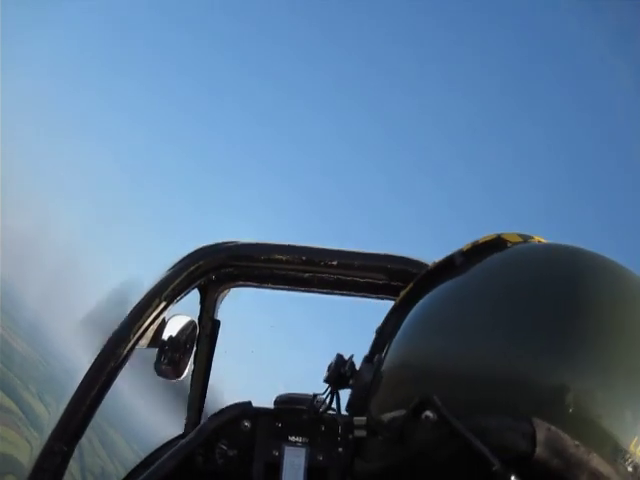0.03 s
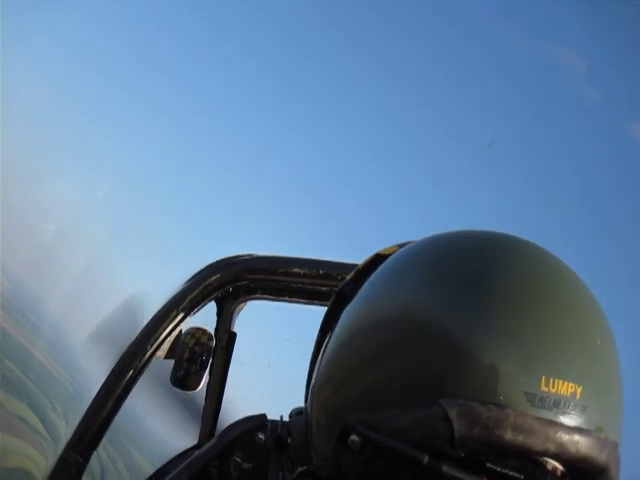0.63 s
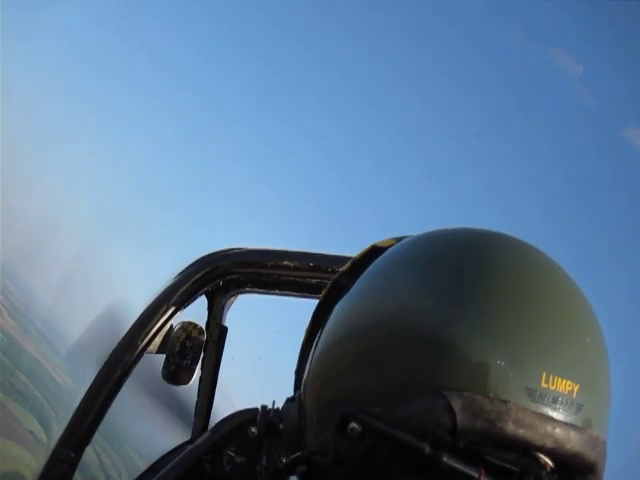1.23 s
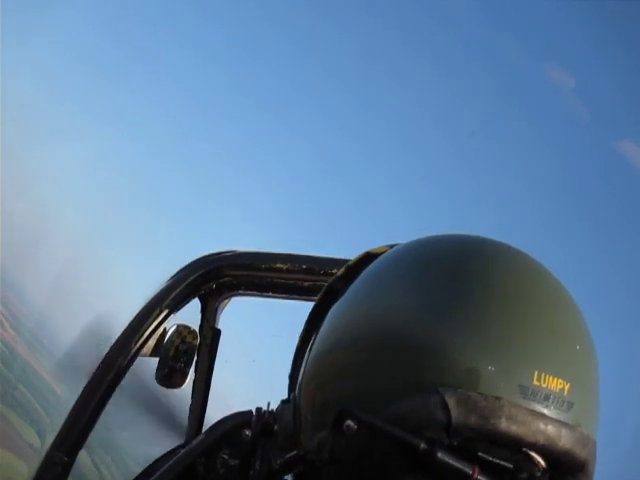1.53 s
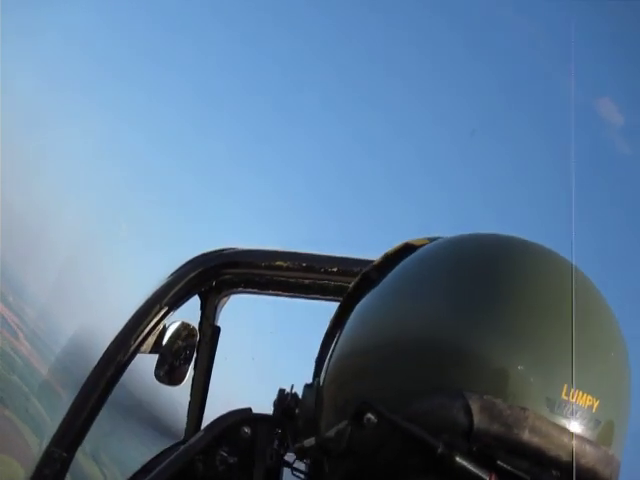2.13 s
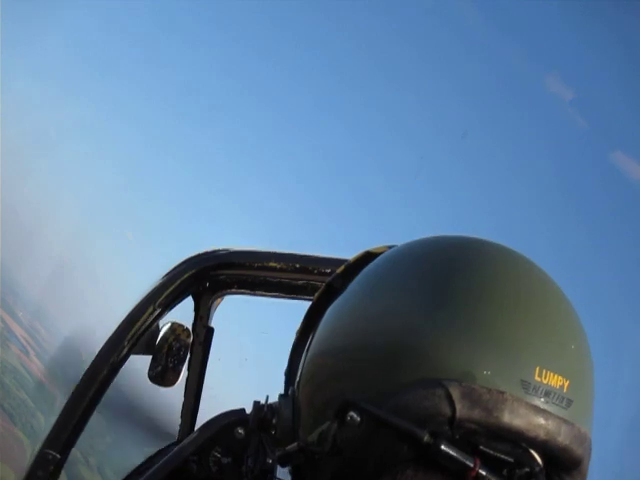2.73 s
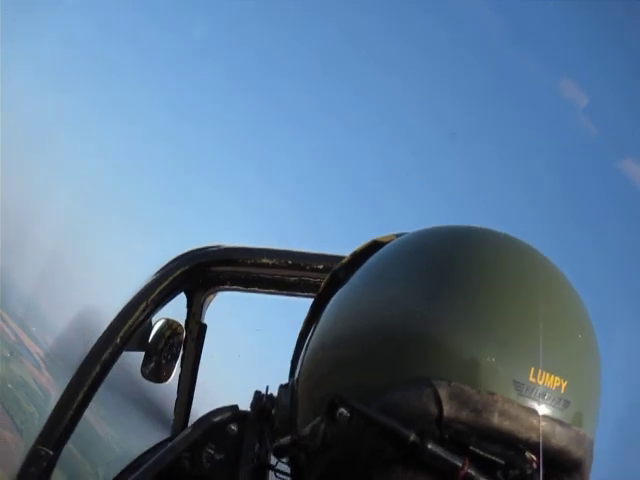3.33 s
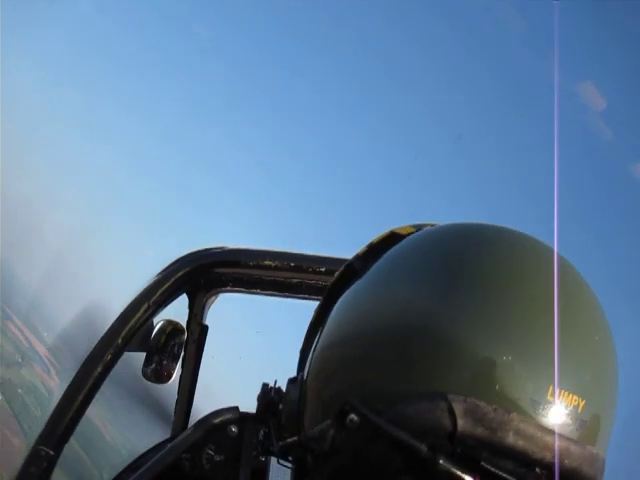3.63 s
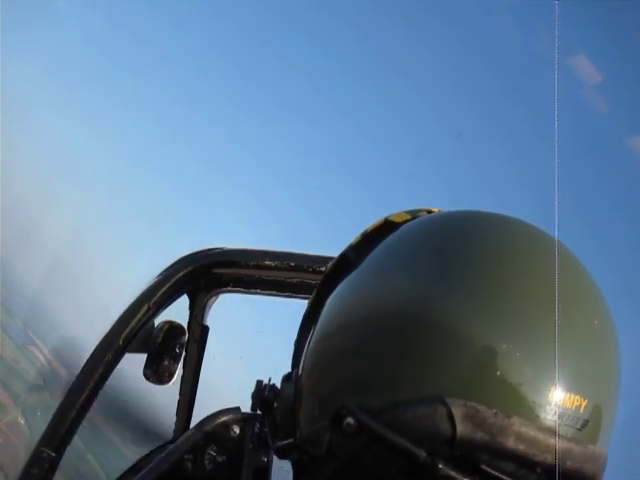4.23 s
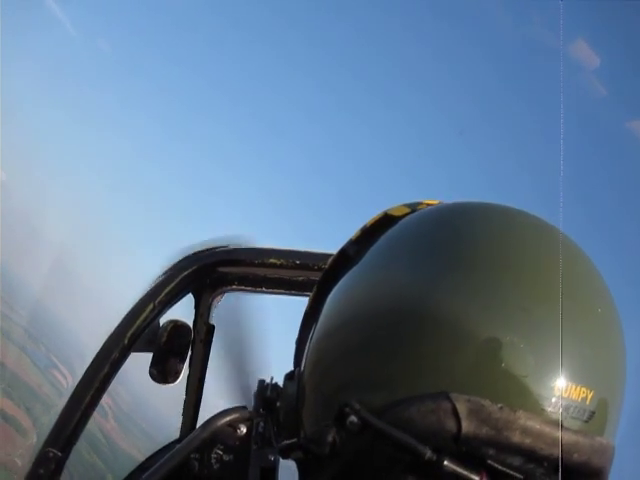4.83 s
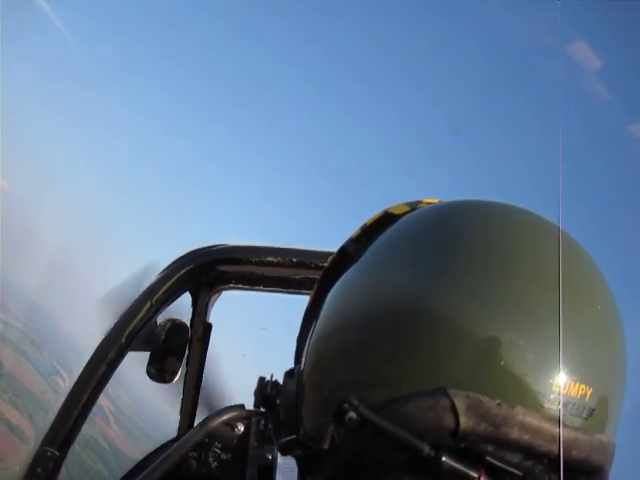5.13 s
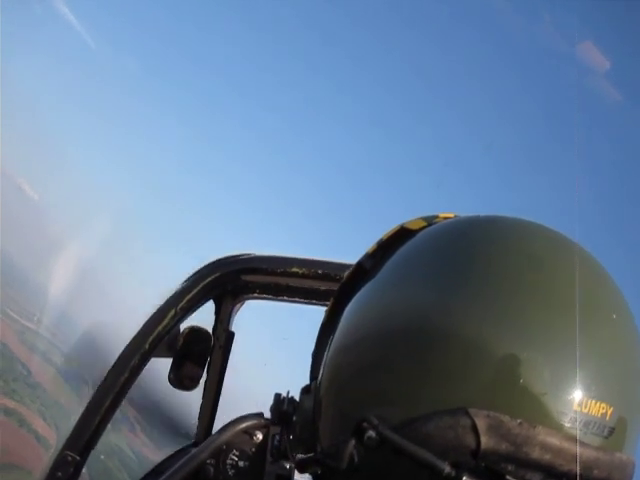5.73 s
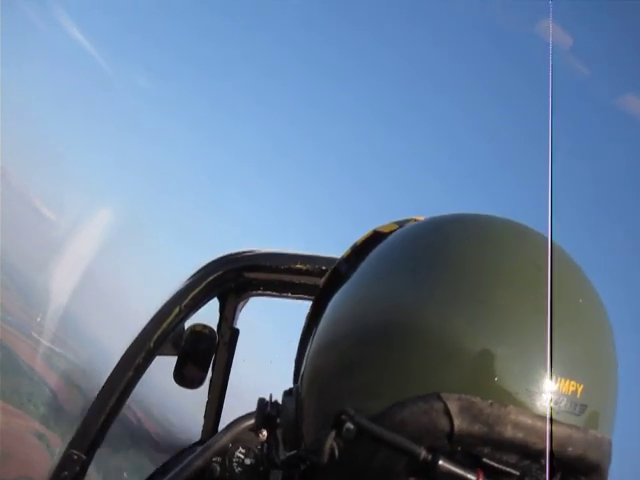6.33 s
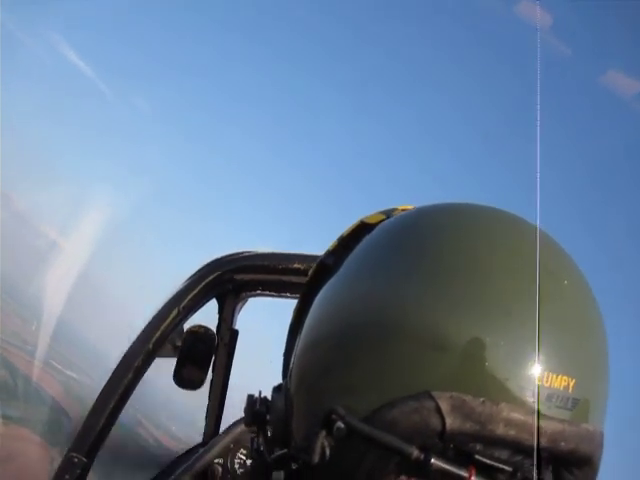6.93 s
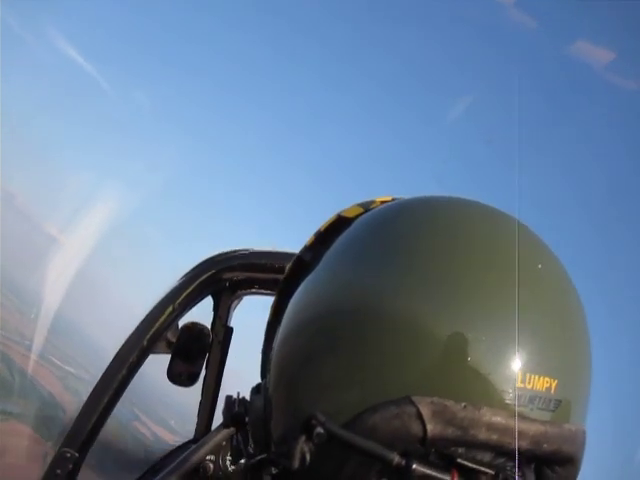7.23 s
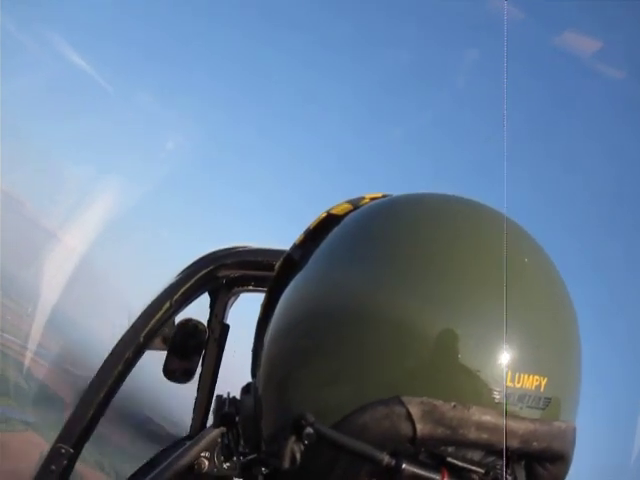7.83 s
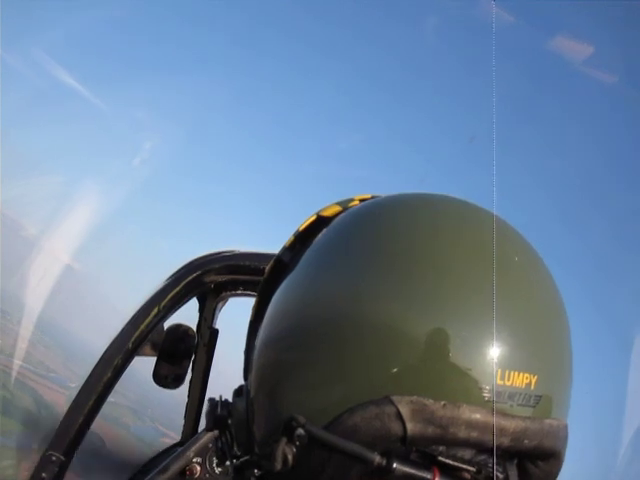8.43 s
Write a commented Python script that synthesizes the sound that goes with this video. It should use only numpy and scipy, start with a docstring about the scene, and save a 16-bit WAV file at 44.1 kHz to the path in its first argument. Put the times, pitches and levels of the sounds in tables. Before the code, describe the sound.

A piston aircraft engine roars steadily in flight, heard from inside the closed cockpit. The exhaust has a fast, rasping crackle, with propeller drone, a hollow howl and rushing air underneath. A few dull thumps from the overloaded microphone come mostly in the first second. About halfway through the roar softens a little, and near the end the engine slows slightly.

```python
"""The steady roar of a twelve-cylinder piston aircraft at cruise, heard inside the closed cockpit.
Exhaust puffs ring the canopy and panels; one cylinder cracks sharply every cycle over a fainter clatter.
Beneath are the airframe's drone, a four-blade propeller, a hollow howl and rushing air.
The recorder overloads in a few dull thumps. The roar softens near 4 s; the engine slows a little at the end.
"""
import sys
import numpy as np
from scipy import signal
from scipy.fft import rfft, irfft
from scipy.io import wavfile
from scipy.ndimage import uniform_filter1d, minimum_filter1d, map_coordinates

SR = 44100
rng = np.random.default_rng(int(sys.argv[2]) if len(sys.argv) > 2 else 0)


def generate_wav(signal):
    """Clip the signal to [-1, 1] and save it as 16-bit WAV at the path in sys.argv[1]."""
    frames = np.transpose(np.atleast_2d(signal))
    scaled = np.clip(frames, -1, 1) * 32767
    pcm = np.round(scaled).astype(np.int16)
    wavfile.write(sys.argv[1], SR, pcm)


N = 373968
TIME = np.arange(N) / SR

# Engine speed. Each row: time in seconds, four-stroke cycles per second.
CYCLE_RATE = [(0.0, 20.85), (1.0, 20.855), (2.0, 20.839), (3.0, 20.9), (3.5, 20.904), (4.0, 20.833),
              (4.5, 20.615), (5.0, 20.686), (5.5, 20.763), (6.0, 20.818), (6.5, 20.827), (7.0, 20.877),
              (7.25, 20.796), (7.5, 20.596), (8.0, 20.065), (8.48, 19.775)]
# Exhaust roar strength. Each row: time in seconds, level in dB.
ROAR_LEVEL = [(0, -12), (.25, -13.5), (.5, -12.5), (1.2, -13), (2.2, -13.5), (3.7, -13), (4.15, -15.5),
              (5.2, -16), (6, -17), (7.5, -17), (8.48, -17)]
# The twelve firings. Each row: place in the cycle from 0 to 1, relative level in dB.
FIRINGS = [(.01, -4), (.09, 0), (.175, -3), (.27, -4.5), (.385, -1), (.48, -2.5), (.55, -4), (.605, -3.5),
           (.742, 1.5), (.825, 1), (.88, -2.5), (.94, -1.5)]
# Canopy and panel resonances. Each row: centre in Hz, width in Hz, lift in dB.
PANEL_MODES = [(1196, 60, 2), (1297, 67, 5.5), (1470, 130, 4.5), (1720, 120, 7), (1868, 160, 3.5),
               (2097, 167, 8.5), (2306, 99, 8.5), (2510, 35, 9), (2660, 177, 6.5), (2862, 190, 8),
               (3047, 50, 10.5), (3300, 410, 5.5), (3505, 164, 7), (3757, 65, 8), (4080, 71, 7.5),
               (4530, 260, 7), (4950, 100, 7), (5460, 110, 6), (6120, 66, 4.5), (7170, 760, 3),
               (7300, 670, -2)]
# Resonances struck by crack and clatter. Each row: centre in Hz, width in Hz, relative level in dB.
CRACK_MODES = [(2966, 340, -7.5), (3580, 570, -9), (4460, 370, -9), (6820, 1040, -9)]


def amp(db):
    """Decibels to gain."""
    return 10 ** (np.asarray(db) / 20)


def unit(x):
    """Scale to unit rms."""
    return x / np.sqrt(np.mean(x ** 2) + 1e-20)


def curve(rows):
    """Join (seconds, value) rows by straight lines."""
    return np.interp(TIME, *np.transpose(rows))


def drift(rate_hz, size=2048):
    """Slow random wander of unit rms."""
    hz = np.fft.rfftfreq(size, TIME[-1] / size)
    wander = unit(irfft(rfft(rng.standard_normal(size)) * np.exp(-(hz / rate_hz) ** 2), size))
    return np.interp(TIME, np.linspace(0, TIME[-1], size), wander)


def colour(x, spectrum, resonances=(), size=8192):
    """Minimum-phase filter of unit power gain: a broad spectrum lifted by ringing resonances."""
    hz = np.fft.rfftfreq(size, 1 / SR)
    knot_hz, knot_db = np.transpose(spectrum)
    db = np.interp(np.log(hz + 1), np.log(knot_hz + 1), knot_db)
    for centre_hz, width_hz, lift_db in resonances:
        db = db + lift_db / (1 + (2 * (hz - centre_hz) / width_hz) ** 2)
    log_gain = np.log(amp(np.r_[db, db[-2:0:-1]]))
    response = np.exp(np.conj(signal.hilbert(log_gain)))
    taps = np.fft.ifft(response).real[:size // 2]
    return signal.oaconvolve(x, taps / np.linalg.norm(taps))[:N]


def resonate(x, hz, width_hz):
    """Resonance following the curve hz; a double pole gives steep flanks."""
    carrier = np.exp(2j * np.pi * np.cumsum(hz) / SR)
    pole = np.exp(-np.pi * width_hz / SR)
    return (carrier * signal.lfilter([(1 - pole) ** 2], [1, -2 * pole, pole * pole], x / carrier)).real


def puff(age_cycles, rise_cycles, sharpness):
    """Gas flow after an exhaust valve opens: rises to one, then dies away."""
    u = np.maximum(age_cycles, 0) / rise_cycles
    return (u * np.exp(1 - u)) ** sharpness


def exhaust(cycles, repeat_share=0.13, floor_db=-3.5, scatter_db=3.0, surge_db=0.48, size=2048):
    """Twelve puffs a cycle ring the panels; part of the flow repeats each cycle, the rest is turbulence."""
    flow_power = amp(floor_db) ** 2
    for place, db in FIRINGS:
        cycle, age = np.divmod(cycles - place + 1, 1)
        force = amp(db + scatter_db * rng.standard_normal(size))  # no two burns alike
        flow = force[cycle.astype(int)] * puff(age, rise_cycles=.024, sharpness=.8)
        flow_power = flow_power + flow ** 2
    pattern = rng.standard_normal(size)
    repeating = unit(map_coordinates(pattern, [cycles % 1 * size], order=3, mode="grid-wrap"))
    gas = np.sqrt(repeat_share) * repeating + np.sqrt(1 - repeat_share) * rng.standard_normal(N)
    # Roar spectrum. Each row: frequency in Hz, relative density in dB.
    spectrum = [(350, -12.5), (480, -21.5), (600, -9), (720, -10.5), (780, -4), (1020, -11.5), (1080, -7.5),
                (1400, -13), (1500, -5.5), (3300, -11), (5500, -8), (7500, -7), (10800, -12.5),
                (17000, -31.5)]
    roar = unit(colour(np.sqrt(flow_power) * gas, spectrum, PANEL_MODES))
    return amp(curve(ROAR_LEVEL) + surge_db * drift(25)) * roar


def crack_force(cycles, load_db, full_db=-5, shortfall_db=2.0, size=256):
    """Force follows the load; burns fall short at random, and a few set ones hit hard."""
    # Hard burns. Each row: time in seconds, level in dB relative to full force.
    hard_burns = [(.93, 4), (.978, 4), (3.853, -2), (4.771, 1.5), (6.072, -1), (7.32, 1.5), (7.611, 0.5)]
    burn_db = -shortfall_db * rng.gamma(2, .5, size)
    for time_s, db in hard_burns:
        burn_db[int(np.interp(time_s, TIME, cycles))] = db
    return amp(full_db + load_db + burn_db[cycles.astype(int)])


def crack(cycles, load_db, place=.39, hiss_db=-4, scatter_db=3.0, detune=0.049, size=256):
    """One cylinder blows down with a bright crack once a cycle, ringing at slightly new pitches."""
    # Blowdown hiss spectrum. Each row: frequency in Hz, relative density in dB.
    spectrum = [(300, -13), (600, -26), (1500, -2.5), (2200, -5), (2800, -3.5), (4400, -0.5), (5100, -0.5),
                (6700, 5.5), (8000, 6.5), (9000, -6), (10000, 6.5), (11000, -11.5), (17000, -19)]
    cycle = cycles.astype(int)
    burst = puff(cycles % 1 - place, rise_cycles=.026, sharpness=1.15) * crack_force(cycles, load_db)
    burst_rms = np.sqrt(np.mean(burst ** 2))
    sound = amp(hiss_db) * colour(burst * rng.standard_normal(N), spectrum, PANEL_MODES)
    for hz, width_hz, db in CRACK_MODES:
        force, shift = rng.standard_normal((size, 2))[cycle].T
        drive = burst * amp(scatter_db * force) * rng.standard_normal(N)
        ring = resonate(drive, hz * (1 + detune * shift), width_hz)
        sound = sound + unit(ring) * burst_rms * amp(db)
    return sound


def clatter(cycles, load_db, gain_db=-21, follow=1.25, scatter_db=6.0, detune=0.093, width_ratio=0.63):
    """Every firing strikes the crack's resonances faintly, each with its own force and pitch."""
    firing, fraction = np.divmod(len(FIRINGS) * cycles, 1)
    burst = puff(fraction / len(FIRINGS), rise_cycles=.02, sharpness=1.15)
    sound = 0
    for hz, width_hz, db in CRACK_MODES:
        force, shift = np.clip(rng.standard_normal((4096, 2)), -2, 2)[firing.astype(int)].T
        drive = burst * amp(scatter_db * force) * rng.standard_normal(N)
        ring = resonate(drive, hz * (1 + detune * shift), width_ratio * width_hz)
        sound = sound + amp(db) * unit(ring)
    return sound * amp(gain_db + follow * load_db)


def canopy(x, echo_db=-16, decay_s=0.011, above_hz=5000, size=600):
    """The hard canopy throws treble back within milliseconds, rippling the spectrum."""
    taps = rng.standard_normal(size) * np.exp(-np.arange(size) / SR / decay_s)
    treble = signal.sosfilt(signal.butter(2, above_hz, "highpass", fs=SR, output="sos"), x)
    return x + amp(echo_db) * signal.oaconvolve(treble, taps / np.linalg.norm(taps))[:N]


def drone(cycles, load_db, follow=0.38, waver_db=1.73, waver_hz=2.5, slip_rad=0.01, slip_hz=8):
    """The airframe carries the engine orders; uneven burns blur the higher ones more."""
    # Engine tones. Each row: multiple of the cycle rate, level in dB at mean load.
    orders = [(2, -58), (3, -38.5), (4, -43.5), (5, -43.5), (6, -36.5), (7, -42), (9, -45.5), (10, -48.5),
              (11, -45), (12, -43), (14, -46), (15, -42), (17, -45), (21, -51), (22, -49), (28, -48),
              (30, -50.5), (32, -46.5), (36, -51), (37, -44), (38, -38), (39, -41.5), (41, -34.5),
              (43, -46), (44, -39), (47, -37.5), (49, -38.5), (50, -42), (58, -41.5), (59, -42),
              (73, -39.5), (82, -41), (85, -40), (91, -39.5), (100, -43), (145, -44)]
    tones = 0
    for order, db in orders:
        phase = 2 * np.pi * (order * cycles + rng.random())
        blur = slip_rad * order * drift(slip_hz)
        tones = tones + amp(db + waver_db * drift(waver_hz)) * np.sin(phase + blur)
    return np.sqrt(2) * amp(follow * load_db) * tones


def propeller(cycles, load_db, gain_db=-3.0, follow=.45, waver_db=1.0,
              boom_hz=152, boom_width_hz=8, boom_db=8):
    """Geared-down blades beat against the engine; as they slow, one tone slides into a cabin resonance."""
    # Propeller tones. Each row: multiple of the blade rate, relative level in dB.
    harmonics = [(1, -30), (2, -41.5), (3, -41), (4, -44)]
    blades_per_cycle = 3.833
    passes = blades_per_cycle * cycles
    blade_hz = blades_per_cycle * curve(CYCLE_RATE)
    tones = 0
    for multiple, db in harmonics:
        lift_db = boom_db / (1 + (2 * (multiple * blade_hz - boom_hz) / boom_width_hz) ** 2)
        tones = tones + amp(db + lift_db) * np.sin(2 * np.pi * (multiple * passes + rng.random()))
    return np.sqrt(2) * tones * amp(gain_db + follow * load_db + waver_db * drift(2.7))


def howl(load_db, level_db=-25, follow=0.36, swell_db=0.95, swell_hz=1.6):
    """Stirred cockpit air howls hollowly, following the load and swelling at random."""
    # Howl spectrum. Each row: frequency in Hz, relative density in dB.
    spectrum = [(400, -39.5), (700, -16.5), (765, -2.5), (800, 1), (830, -5.5), (900, 2), (945, 1),
                (1010, -1), (1080, -9.5), (1500, -44.5)]
    swell = amp(level_db + follow * load_db + swell_db * drift(swell_hz))
    return swell * unit(colour(rng.standard_normal(N), spectrum))


def slipstream(load_db, level_db=-27, follow=0.089, buffet_db=0.8, buffet_hz=12):
    """Air rumbles and hisses over the canopy."""
    # Airflow spectrum. Each row: frequency in Hz, relative density in dB.
    spectrum = [(20, -14), (42, -6), (80, -6.5), (125, 1.5), (170, -3), (290, -1.5), (360, -16.5),
                (450, -7.5), (520, -13), (620, -6), (1100, -5), (4000, -12.5), (16000, -34.5)]
    rush = unit(colour(rng.standard_normal(N), spectrum))
    return rush * amp(level_db + follow * load_db + buffet_db * drift(buffet_hz))


def overload_thumps(pitch_hz=440, decay_s=0.0018, lead_s=0.0013):
    """Dull low thumps of the recorder overloading, each one heavily damped swing."""
    # Each row: time in seconds, level in dB.
    thumps = [(.02, -15), (.115, -15), (.404, -10), (0.55, -14), (0.691, -12), (0.711, -11), (.932, -5),
              (2.774, -22), (3.374, -13), (3.422, -12), (3.854, -17), (5.642, -13)]
    sound = np.zeros(N)
    t = np.arange(SR // 50) / SR
    swing = np.exp(-t / decay_s) * np.sin(2 * np.pi * pitch_hz * t)
    for time_s, db in thumps:
        start = max(round((time_s - lead_s) * SR), 0)
        sound[start:start + len(t)] += amp(db) * swing
    return sound


def scene():
    """One crankshaft times firings, drone and propeller; all but the thumps follow one load."""
    cycles = np.cumsum(curve(CYCLE_RATE)) / SR
    roar_db = curve(ROAR_LEVEL)
    load_db = roar_db - roar_db.mean()  # a layer's `follow` is its dB per dB of load
    firings = exhaust(cycles) + crack(cycles, load_db) + clatter(cycles, load_db)
    engine = canopy(firings) + drone(cycles, load_db)
    cockpit = engine + propeller(cycles, load_db) + howl(load_db) + slipstream(load_db)
    return (cockpit + overload_thumps())[None]


def record(dry, ceiling=1.0, low_cut_hz=22, high_cut_hz=17100, hold_samples=11):
    """Low cut, fast peak limiter, band limit."""
    sound = signal.sosfilt(signal.butter(2, low_cut_hz, "highpass", fs=SR, output="sos"), dry)
    needed_gain = ceiling / np.maximum(abs(sound), ceiling)
    gain = uniform_filter1d(minimum_filter1d(needed_gain, hold_samples), hold_samples)
    lowpass = signal.firwin(511, high_cut_hz, window=("kaiser", 9), fs=SR)
    return signal.oaconvolve(sound * gain, lowpass[None], "same")


dry = scene()
out = record(dry)
generate_wav(out)
```